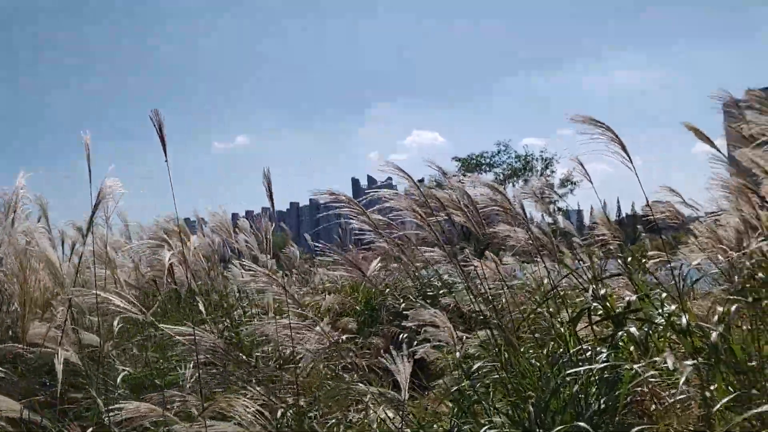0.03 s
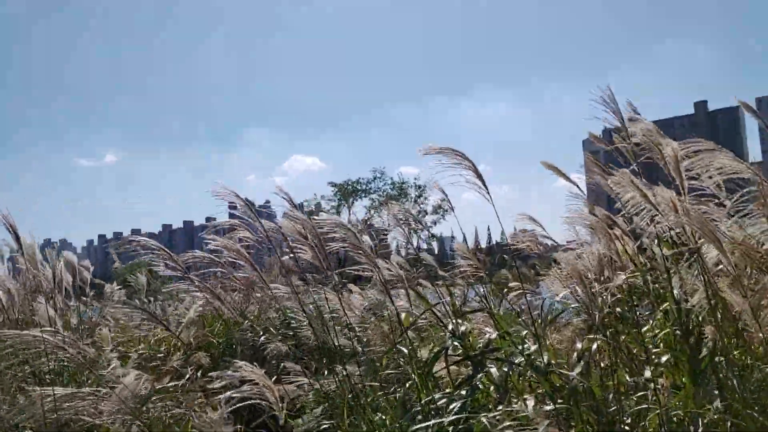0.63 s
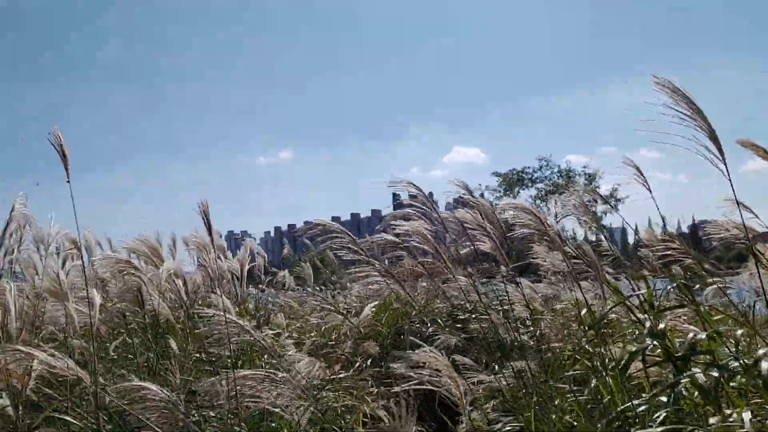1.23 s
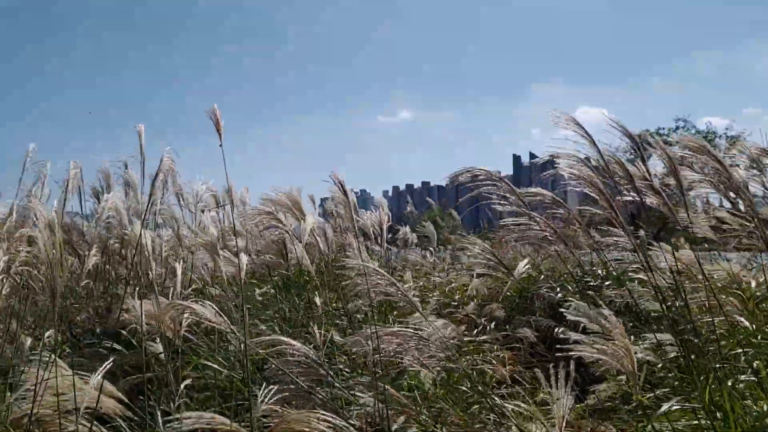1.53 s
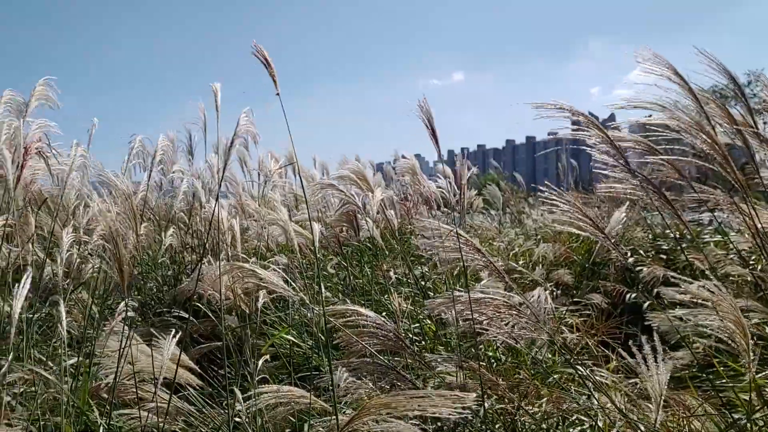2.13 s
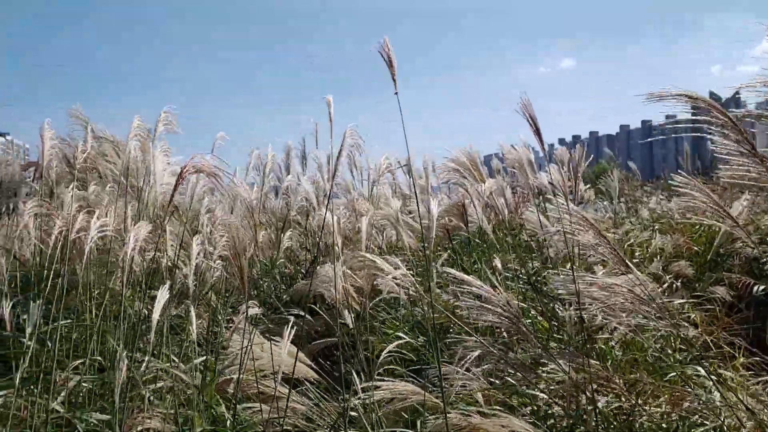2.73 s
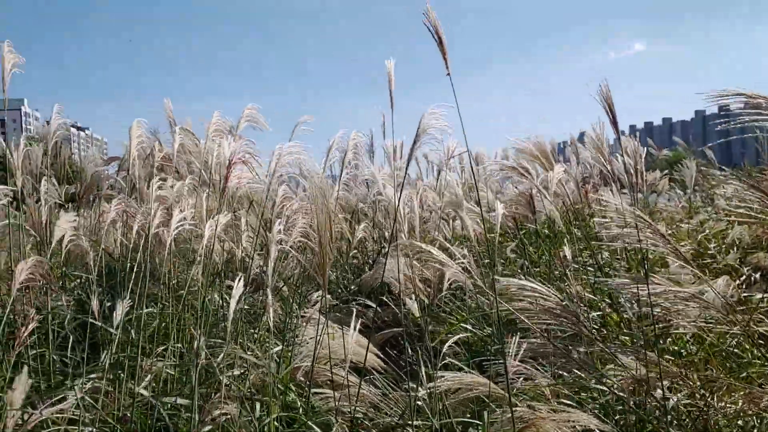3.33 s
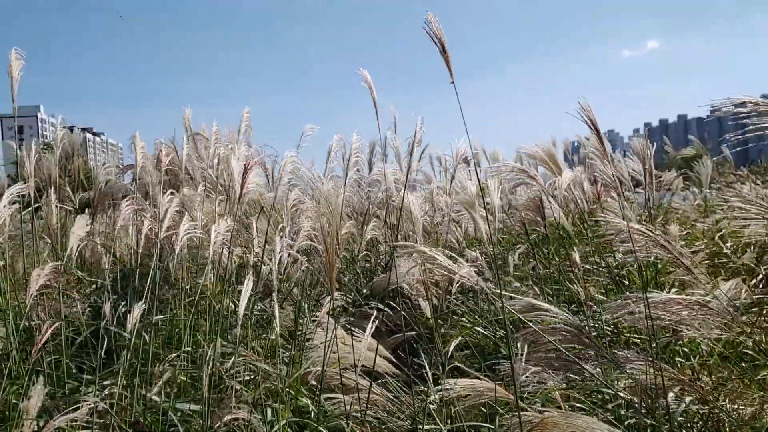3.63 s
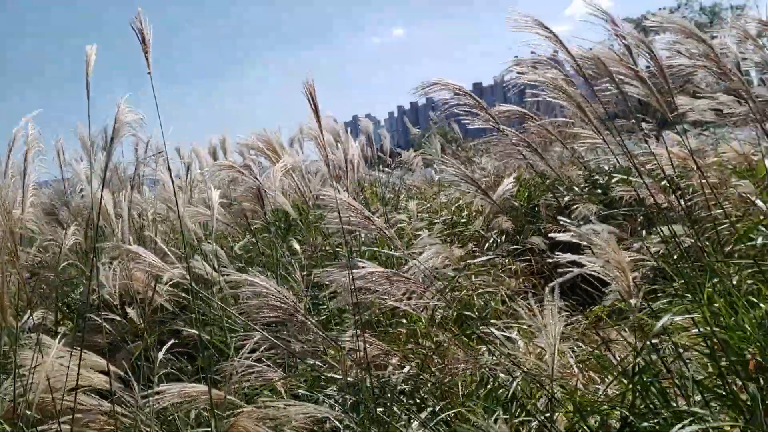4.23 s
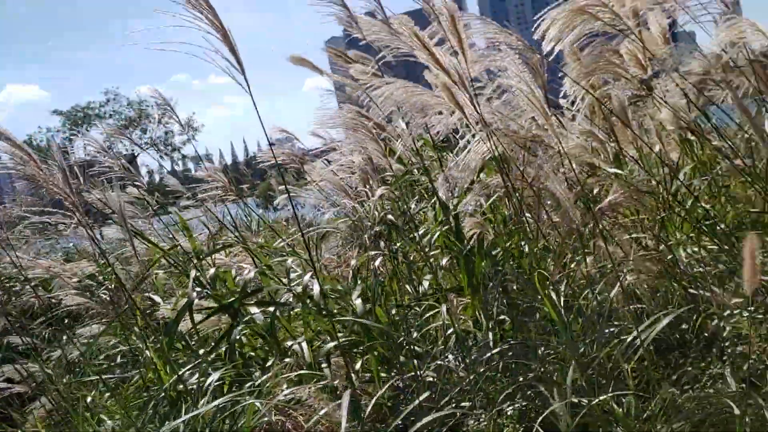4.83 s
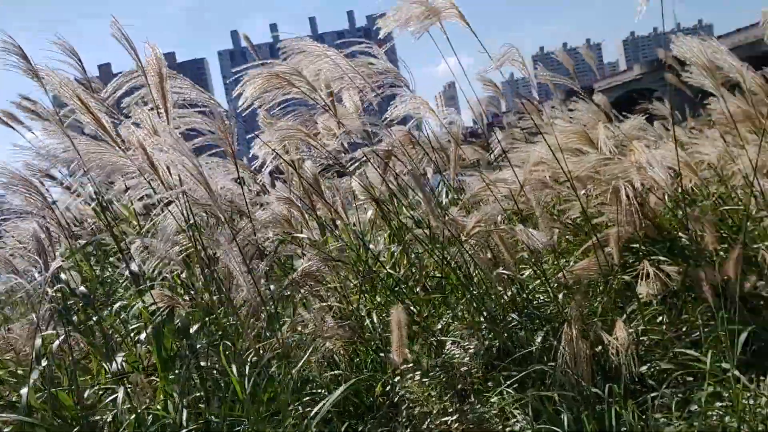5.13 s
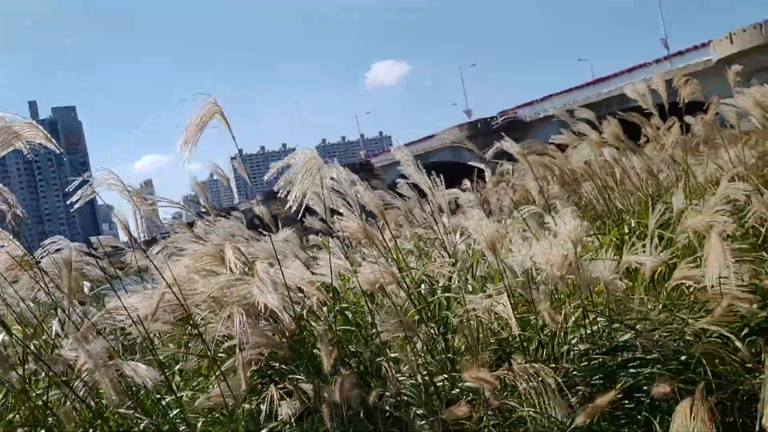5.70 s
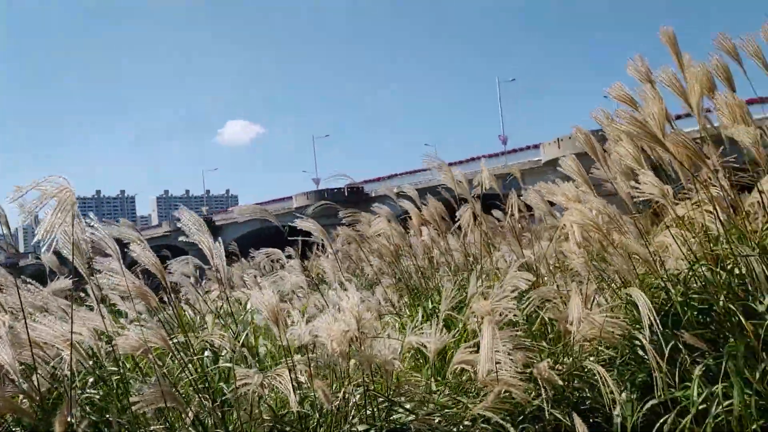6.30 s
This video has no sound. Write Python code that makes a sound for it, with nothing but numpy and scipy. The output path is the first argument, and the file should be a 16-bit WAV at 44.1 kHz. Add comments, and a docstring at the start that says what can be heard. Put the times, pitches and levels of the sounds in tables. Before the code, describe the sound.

Tall dry grass rustles close to a hand-held microphone outdoors, over a soft, steady wash of distant traffic. From about 0.3 to 2.5 seconds, light gusts rumble and thump on the microphone while clumps of grass swish and dry blades tick, with a cluster of sharp crackles between 1.2 and 1.5 seconds. The wind then eases. A faint, very high cricket rasps five or six times a second throughout, clearest from 2 to 3.5 seconds. At about 3.6 seconds a thin insect hiss swells and fades over the next second. From about 4.9 seconds much stronger gusts buffet the microphone with low rumbling and blunt thumps, loudest around 5.3 seconds and again near 6. More swishes and scattered ticks come through the wind, which drops away just before the end at 6.5 seconds.

```python
"""Wind buffets a small hand-held microphone in tall dry grass by a road bridge.
Gusts rumble and single eddies thump at the sound port; nearby blades rustle and tick as they slip.
A bush cricket rasps file on scraper five or six times a second, and a thin insect hiss surges once.
Tyre noise and the faint hiss of the field wash in from far away."""
import sys
import numpy as np
from scipy import signal
from scipy.fft import rfft, irfft, next_fast_len
from scipy.io import wavfile
from scipy.ndimage import uniform_filter1d

SR = 44100
rng = np.random.default_rng(int(sys.argv[2]) if len(sys.argv) > 2 else 0)


def digitize_waveform(pressure):
    """Quantize a signal to 16-bit integers and store it at the path in sys.argv[1].

    Rows of a 2-D input are taken as channels; values are limited to [-1, 1].
    """
    field = np.atleast_2d(pressure).T
    bounded = np.clip(field, -1, 1)
    quanta = np.round(bounded * 32767).astype(np.int16)
    wavfile.write(sys.argv[1], SR, quanta)


N = 284886
TIME_S = np.arange(N) / SR


def gain_of(db):
    """Decibels to amplitude."""
    return 10 ** (np.asarray(db) / 20)


def unit_rms(x):
    """Scales to rms 1."""
    return x / np.sqrt(np.mean(x ** 2) + 1e-20)


def follow(curve):
    """A (t/s, value) curve at every sample."""
    return np.interp(TIME_S, *np.transpose(curve))


def add(mix, start_s, sound):
    """Mixes a sound in at start_s."""
    part = mix[max(round(start_s * SR), 0):][:len(sound)]
    part += sound[:len(part)]


def coloured(x, spectrum):
    """Filters by a (f/Hz, level/dB) spectrum, keeping the power of white noise."""
    size = next_fast_len(len(x))
    hz = np.fft.rfftfreq(size, 1 / SR)
    knots_hz, knots_db = np.transpose(spectrum)
    response = unit_rms(gain_of(np.interp(np.log(hz + 1), np.log(knots_hz), knots_db)))
    return irfft(rfft(x, size) * response, size)[:len(x)]


def wander(rate_hz):
    """Random drift of rms 1, low-passed at rate_hz."""
    size = next_fast_len(N)
    hz = np.fft.rfftfreq(size, 1 / SR)
    spectrum = rfft(rng.standard_normal(size)) / (1 + (hz / rate_hz) ** 4)
    return unit_rms(irfft(spectrum, size)[:N])


def patchy_noise(depth_db):
    """White noise whose level drifts in patches of time and frequency."""
    bins = signal.stft(rng.standard_normal(N), nperseg=512)[2]
    patches = uniform_filter1d(rng.standard_normal(bins.shape), size=7, axis=0)
    patches = unit_rms(uniform_filter1d(patches, size=14, axis=1))
    return unit_rms(signal.istft(bins * gain_of(depth_db * patches), nperseg=512)[1][:N])


def swell(peak_s, width_s, peak_db, steepness):
    """Power envelope of one rise and fall, width_s wide at half power."""
    t = TIME_S[::32]
    power = gain_of(peak_db) ** 2 / (1 + abs(2 * (t - peak_s) / width_s) ** steepness)
    return np.interp(TIME_S, t, power)


# far-field spectrum: f/Hz, level/dB
FIELD_SPECTRUM = [(1000, -27), (4500, -9), (8000, -6), (10000, -3), (11500, -1), (12800, 3), (14000, 1),
                  (16000, -8)]


def field_hiss(level_db=-59, patchy_db=3.5):
    """The faint high hiss of the far field."""
    return gain_of(level_db) * coloured(patchy_noise(patchy_db), FIELD_SPECTRUM)


# tyre spectrum: f/Hz, level/dB
TYRE_SPECTRUM = [(25, 0), (55, 4), (110, -2), (220, -6), (350, 2), (550, 2.5), (730, 0.5), (1020, 2.5),
                 (1500, -2.5), (2400, -7.5), (3200, -15), (4300, -26.5), (8000, -21.5), (16000, -41)]
# traffic envelope: t/s, relative level/dB
TRAFFIC_ENVELOPE = [(0.0, -46), (2.7, -46), (4.25, -45), (4.8, -46.8), (5.25, -45), (6.46, -44.5)]


def traffic(gain_db=6, patchy_db=0.96):
    """Tyre noise of many far cars, its treble lost on the way."""
    tyres = coloured(patchy_noise(patchy_db), TYRE_SPECTRUM)
    return gain_of(follow(TRAFFIC_ENVELOPE) + gain_db) * tyres


# insect chorus spectrum: f/Hz, level/dB
CHORUS_SPECTRUM = [(2500, -32), (3600, -2.5), (4100, -32), (4900, -33), (5400, 1), (5900, -15), (6400, 1.5),
                   (7100, -1.5), (8400, 1.5), (9300, -31), (11000, -39)]
# chorus envelope without the surge: t/s, relative level/dB
CHORUS_ENVELOPE = [(0, -62), (1.0, -58.5), (2.95, -56.5), (3.6, -58.5), (5.0, -60), (6.46, -54.5)]


def insects(gain_db=-1, flutter_db=0.5, flutter_hz=70,
            surge_s=3.61, surge_db=-49.5, rise_s=0.11, hold_s=0.16, fade_db_per_s=15.5):
    """Many small rasps merge into a narrow, fluttering hiss that surges once, holds and fades."""
    t = TIME_S - surge_s
    fade_db = fade_db_per_s * np.maximum(t - rise_s - hold_s, 0)
    surge = np.clip(t / rise_s, 0, 1) * gain_of(surge_db - fade_db)
    envelope = gain_of(gain_db) * np.hypot(gain_of(follow(CHORUS_ENVELOPE)), surge)
    flutter = gain_of(flutter_db * wander(flutter_hz))
    return envelope * flutter * coloured(rng.standard_normal(N), CHORUS_SPECTRUM)


# wing rasp spectrum: f/Hz, level/dB
WING_SPECTRUM = [(8500, -29), (10500, -8), (11300, -4), (11900, -7), (12700, 0), (13600, 0), (14300, -3),
                 (15000, -1), (16000, -3.5)]
# chirp pace: t/s, rate/Hz
CHIRP_PACE = [(0, 5.05), (1.6, 5.05), (2.5, 5.65), (3.6, 5.75), (3.88, 6.45), (4.5, 5.35), (6.46, 5.29)]
# cricket envelope: t/s, level/dB
CRICKET_ENVELOPE = [(0, -63), (1.1, -64), (1.8, -56.5), (2.6, -54), (3.4, -54), (3.9, -58.5), (5.1, -59),
                    (5.8, -63), (6.46, -63)]


def bush_cricket(first_s=0.275, chirp_s=0.125, stroke_hz=64, stroke_db=3.0):
    """Each chirp is a short run of wing strokes, each stroke a rasp of file on scraper."""
    chirps, t = np.zeros(N), np.arange(round(chirp_s * SR)) / SR
    rasp = coloured(rng.standard_normal(N), WING_SPECTRUM)
    count = np.ceil(np.cumsum(follow(CHIRP_PACE) * (TIME_S > first_s)) / SR)
    centres_s = TIME_S[1:][np.diff(count) > 0]
    for centre_s in centres_s:
        detune, phase = rng.uniform(-1, 1, 2)
        cycles = stroke_hz * (1 + 0.06 * detune) * t + phase
        strokes = unit_rms(gain_of(stroke_db * np.cos(2 * np.pi * cycles)))
        add(chirps, centre_s - chirp_s / 2, strokes * signal.windows.tukey(len(t), 0.4))
    return gain_of(follow(CRICKET_ENVELOPE)) * chirps * rasp


# rustle spectrum: f/Hz, level/dB
GRASS_SPECTRUM = [(500, -46), (1500, 5), (2300, 9), (3500, 2), (5000, 3), (6000, 0.5), (7300, 5.5),
                  (8800, 1), (10200, -6), (11500, -11), (16000, -6)]
# whole field stirring: t/s, relative level/dB
STIR_ENVELOPE = [(0, -56), (1.0, -54.5), (2.4, -58.5), (3.3, -63.5), (4.0, -57), (4.8, -63), (5.4, -57),
                 (6.46, -67)]
# clumps brushing, drier ones with more treble: peak t/s, width/s, relative level/dB, treble/dB
CLUMP_SWISHES = [(0.286, 0.1, -49, -5), (0.483, 0.074, -46, -11), (0.698, 0.19, -56.5, -10),
                 (0.833, 0.073, -52.5, 4.5), (0.96, 0.12, -53, 0), (1.209, 0.063, -44, 1.5),
                 (1.375, 0.25, -50, 3.5), (1.56, 0.28, -61, 4), (2.078, 0.13, -47.5, -4),
                 (5.204, 0.22, -51, -0.5), (5.497, 0.15, -52.5, 2), (5.685, 0.13, -56, 4.5),
                 (6.014, 0.33, -54, -0.5), (6.413, 0.1, -55.5, 0)]


def grass_rustle(gain_db=5, slips_per_s=1100, spread_db=4, slip_s=0.00044, smooth_share=0.39,
                 patchy_db=1.37, split_hz=6500, stir_treble_db=-3.5):
    """Countless tiny slips of blade on blade over the smooth swish of the plumes."""
    onsets = rng.random(N) < slips_per_s / SR
    slips = onsets * gain_of(spread_db * np.minimum(rng.exponential(1, N), 3.5))
    slip_power = signal.lfilter([1], [1, -np.exp(-2 / (slip_s * SR))], slips ** 2)
    grain = np.sqrt(smooth_share + (1 - smooth_share) * slip_power / slip_power.mean())
    swish = coloured(grain * patchy_noise(patchy_db), GRASS_SPECTRUM)
    treble = signal.sosfiltfilt(signal.butter(2, split_hz, "high", fs=SR, output="sos"), swish)
    body = swish - treble
    body_power = gain_of(follow(STIR_ENVELOPE)) ** 2
    treble_power = body_power * gain_of(stir_treble_db) ** 2
    for peak_s, width_s, level_db, treble_db in CLUMP_SWISHES:
        brush_power = swell(peak_s, width_s, level_db, steepness=5.6)
        body_power += brush_power
        treble_power += brush_power * gain_of(treble_db) ** 2
    return gain_of(gain_db) * (np.sqrt(body_power) * body + np.sqrt(treble_power) * treble)


# dry blade crack spectrum: f/Hz, level/dB
CRACK_SPECTRUM = [(900, -30), (1700, -13), (2300, 10), (3500, -1.5), (5000, 3), (6000, -6.5), (7300, 6),
                  (8700, -9), (10200, -6), (11500, -16), (16000, -21)]
# blades and stalks snapping nearby: t/s, relative level/dB, tilt/(dB/octave)
BLADE_SNAPS = [(0.307, -25, -9), (0.337, -26, -11), (0.681, -33, -2), (0.824, -29, 13), (0.834, -20.5, 18),
               (0.852, -28, 11), (1.2104, -19.5, 2.5), (1.2234, -24, -1), (1.235, -23.5, 2),
               (1.297, -30, 1), (1.3094, -16, 2.5), (1.3445, -18, 0.5), (1.36, -19.5, 4), (1.412, -26, 3),
               (1.448, -20.5, 6), (1.7768, -27.5, 6), (2.106, -22, 5), (5.51, -22.5, 2), (5.608, -22.5, -3),
               (5.721, -23.5, 9), (5.8875, -26, 2), (6.155, -20.5, 1.5)]


def blade_ticks(gain_db=-7, rise_s=0.00054, scrape_db=-20, scrape_s=0.005, pivot_hz=6000):
    """A blade slips free with a crack and scrapes on briefly; thin blades are brighter than stalks."""
    out, t = np.zeros(N), np.arange(SR // 30) / SR
    crack = t / rise_s * np.exp(1 - t / rise_s)
    scrape = gain_of(scrape_db) * np.exp(-t / scrape_s)
    for start_s, level_db, tilt in BLADE_SNAPS:
        spectrum = [(hz, db + tilt * np.log2(hz / pivot_hz)) for hz, db in CRACK_SPECTRUM]
        noise = coloured(rng.standard_normal(len(t)), spectrum)
        add(out, start_s, gain_of(level_db + gain_db) * (crack + scrape) * noise)
    return out


# strong eddies hitting the microphone: t/s, relative level/dB
EDDY_HITS = [(0.542, -19.5), (0.656, -14.5), (0.809, -18), (1.478, -18), (2.154, -20), (2.259, -20),
             (3.47, -24), (4.606, -25.5), (4.785, -28), (4.86, -13), (4.925, -10.5), (4.996, -5),
             (5.092, -5.5), (5.141, -7.5), (5.3, -0.5), (5.368, -1.5), (5.391, -4), (5.944, -11),
             (6.033, -3.5), (6.178, -5), (6.248, -12), (6.38, -19)]


def eddy_thumps(gain_db=-2, base_hz=320, db_per_octave=26, sigma_cycles=0.46, rise_s=0.00942):
    """Each eddy is a short swing of pressure; the stronger, the quicker."""
    out, t = np.zeros(N), np.arange(SR // 25) / SR - rise_s
    for start_s, level_db in EDDY_HITS:
        cycles = t * base_hz * 2 ** (level_db / db_per_octave)
        envelope = np.exp(-0.5 * (cycles / sigma_cycles) ** 2)
        swing = np.cos(2 * np.pi * (cycles + rng.random()))
        add(out, start_s, gain_of(level_db + gain_db) * envelope * swing)
    return out


# gusts crossing the microphone: peak t/s, width/s, level/dB
WIND_GUSTS = [(0.407, 0.16, -44), (0.637, 0.074, -28), (0.77, 0.07, -34.5), (0.942, 0.055, -26),
              (1.259, 0.042, -32.5), (1.414, 0.22, -33.5), (1.723, 0.68, -37.5), (2.052, 0.12, -27),
              (2.217, 0.12, -32.5), (2.47, 0.17, -37.5), (3.5, 0.18, -41), (4.33, 0.35, -47.5),
              (5.162, 0.28, -20), (5.399, 0.07, -16), (5.55, 0.16, -26.5), (5.974, 0.23, -23),
              (6.206, 0.15, -27.5)]


def airflow_db(breeze_db=-54, steepness=5.23, wake_db=-11.5, wake_s=0.022, wake_lag_s=0.012):
    """Buffet level: a light breeze, the gusts, and the turbulent wake of every eddy."""
    gusts = sum(swell(peak_s, width_s, db, steepness) for peak_s, width_s, db in WIND_GUSTS)
    wakes = sum(swell(hit_s + wake_lag_s, wake_s, db + wake_db, steepness) for hit_s, db in EDDY_HITS)
    return 10 * np.log10(gain_of(breeze_db) ** 2 + gusts + wakes)


def wind_buffet(low_hz=140, high_hz=270, reference_db=-27, db_per_octave=21, rolloff_order=3.82,
                lumps_db=2.5, lumps_hz=55):
    """Turbulence at the port: lumpy rumble whose band moves higher as the air moves faster."""
    level_db = airflow_db()
    hz, frames_s, bins = signal.stft(rng.standard_normal(N), SR, nperseg=1024, noverlap=768)
    hz = hz[:, None]
    excess_db = np.clip(np.interp(frames_s, TIME_S, level_db) - reference_db, -6, 11)
    speed_ratio = 2 ** (excess_db / db_per_octave)
    highpass = hz ** 2 / np.hypot(hz ** 2, (low_hz * speed_ratio) ** 2)
    lowpass = 1 / np.hypot(1, (hz / (high_hz * speed_ratio)) ** rolloff_order)
    band = highpass * lowpass
    band /= np.sqrt(np.mean(band ** 2, axis=0))
    rumble = signal.istft(bins * band, nperseg=1024, noverlap=768)[1][:N]
    lumps = gain_of(lumps_db * wander(lumps_hz))
    return gain_of(level_db) * unit_rms(rumble * lumps)


def scene():
    """Background, grass and wind on the microphone, in mono."""
    background = field_hiss() + traffic() + insects() + bush_cricket()
    grass = grass_rustle() + blade_ticks()
    wind = eddy_thumps() + wind_buffet()
    return (background + grass + wind)[None]


def record(dry, port_hz=7830, port_width_hz=720, port_db=7.5, low_cut_hz=88, band_limit_hz=15800):
    """The sound port's resonance, a low cut against wind, then the band limit."""
    b, a = signal.iirpeak(port_hz, port_hz / port_width_hz, fs=SR)
    ringing = dry + (gain_of(port_db) - 1) * signal.lfilter(b, a, dry)
    trimmed = signal.sosfilt(signal.butter(4, low_cut_hz, "high", fs=SR, output="sos"), ringing)
    lowpass = signal.firwin(511, band_limit_hz, window=("kaiser", 9), fs=SR)
    return signal.oaconvolve(trimmed, lowpass[None], "same")


dry = scene()
out = record(dry)
digitize_waveform(out)
```